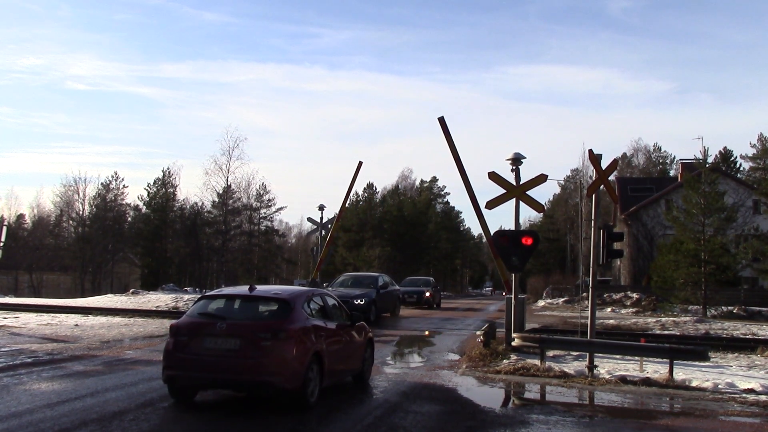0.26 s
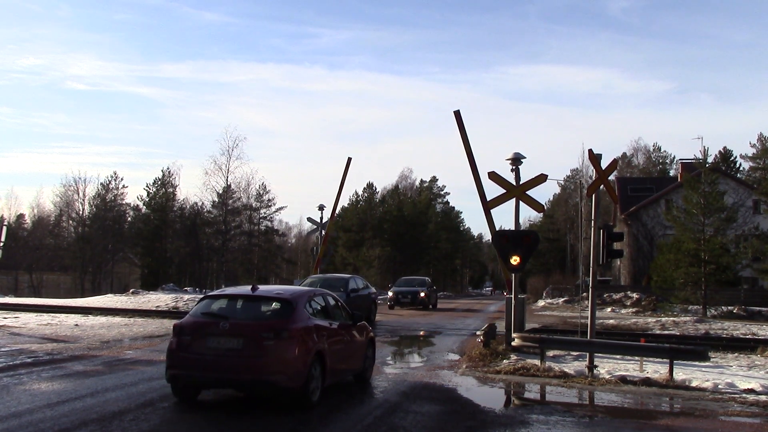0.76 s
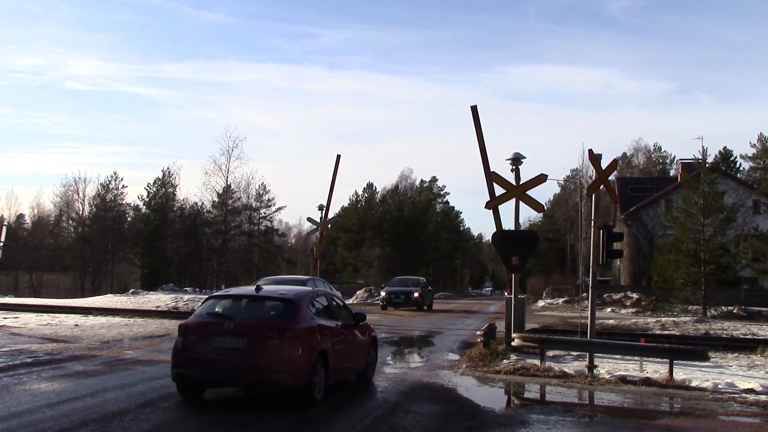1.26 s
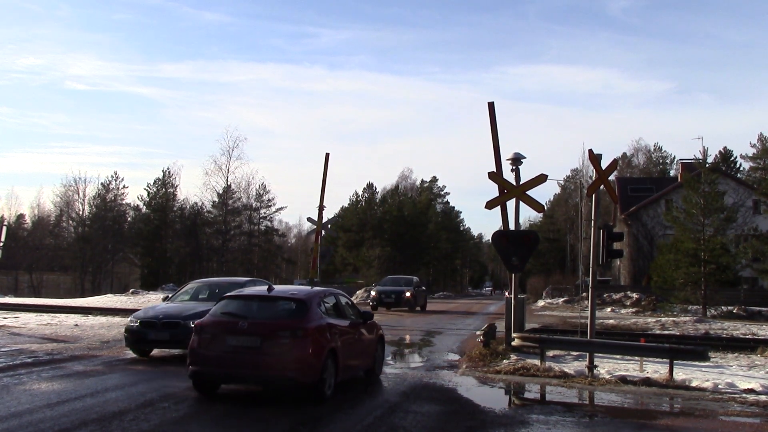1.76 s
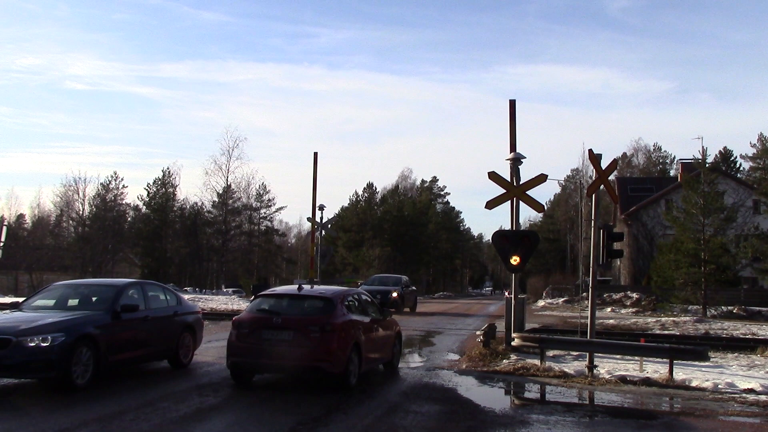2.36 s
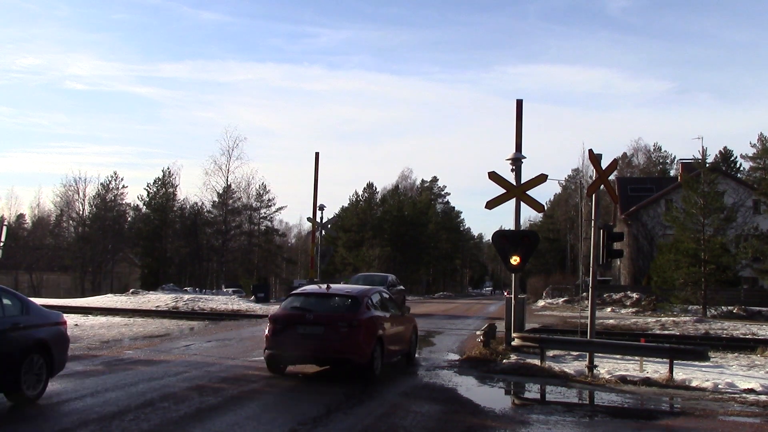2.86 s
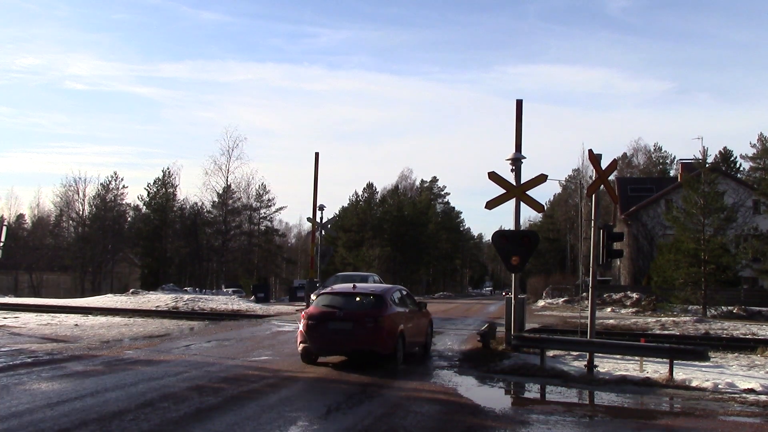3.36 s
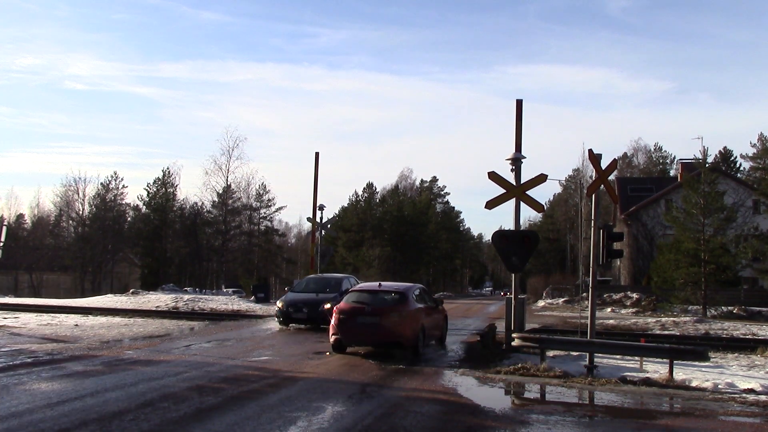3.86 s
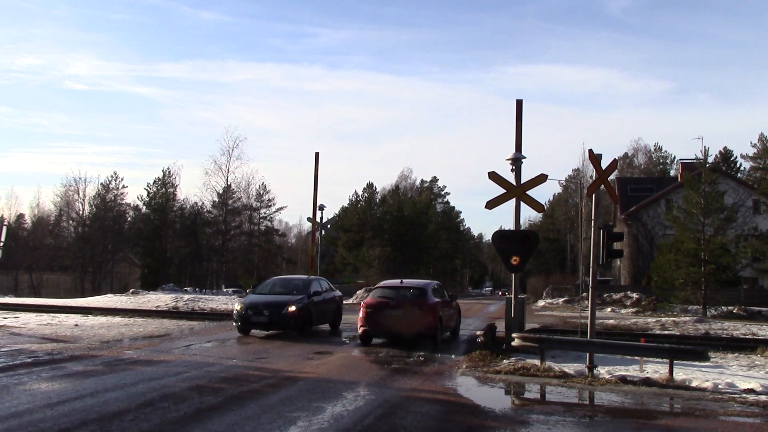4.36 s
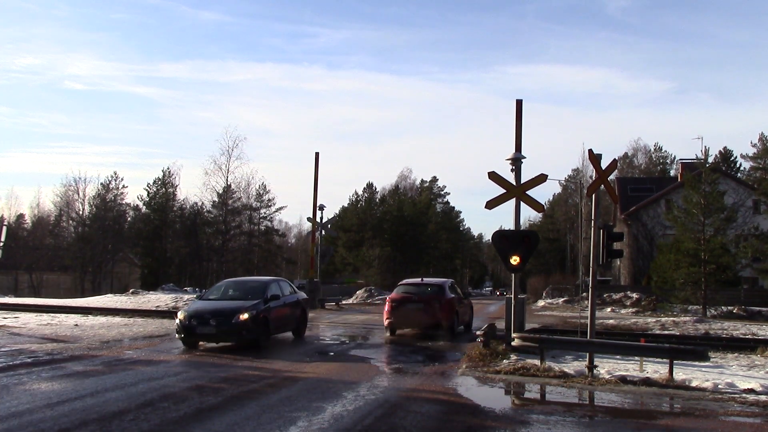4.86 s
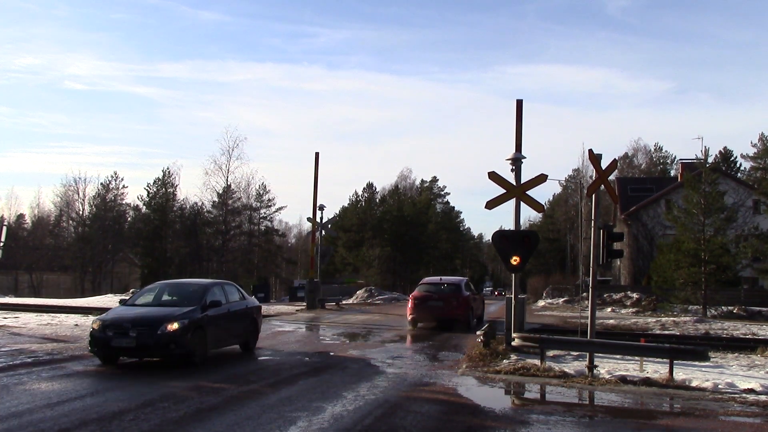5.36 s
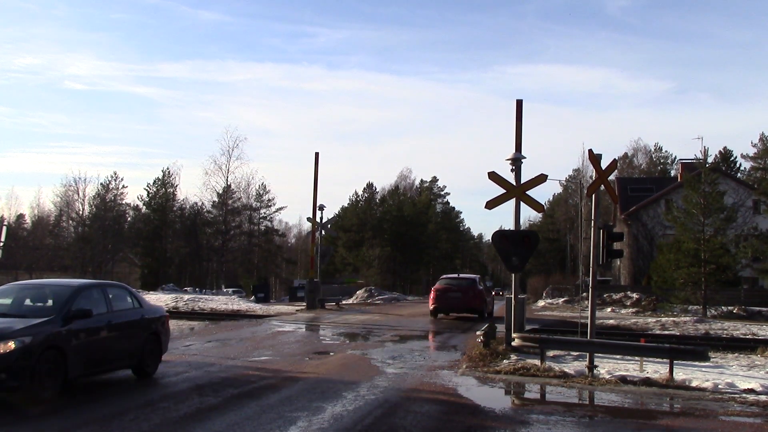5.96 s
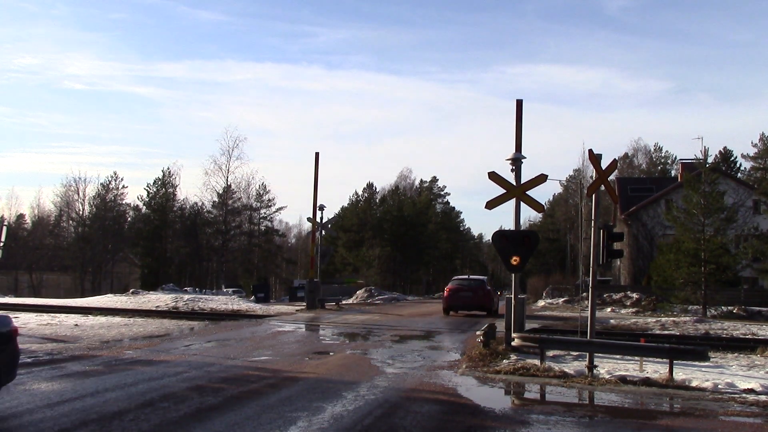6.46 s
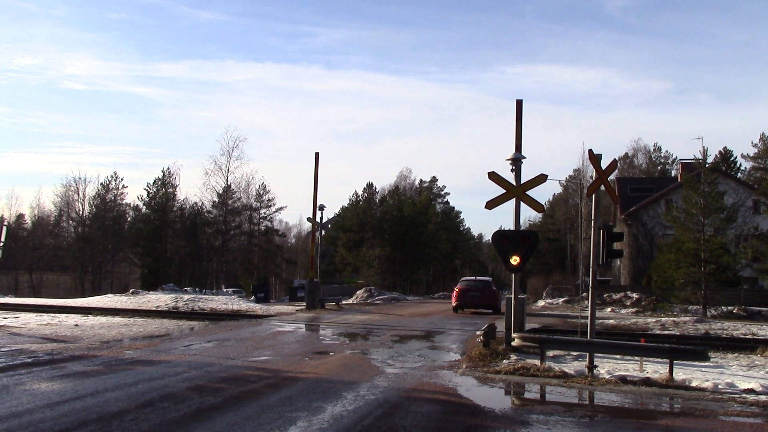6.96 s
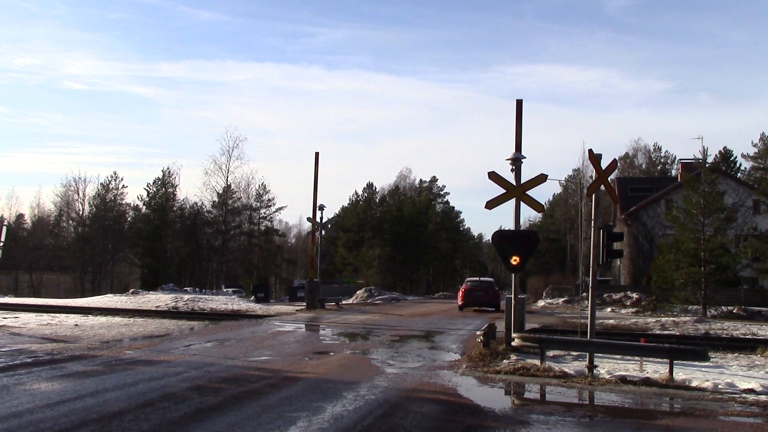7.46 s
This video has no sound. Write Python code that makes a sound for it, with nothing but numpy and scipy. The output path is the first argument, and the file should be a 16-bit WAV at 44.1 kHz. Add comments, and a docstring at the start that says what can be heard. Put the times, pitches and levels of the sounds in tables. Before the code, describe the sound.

Slow tyres on wet, gritty asphalt, heard close from the roadside. A quiet rolling drone with scattered pops leads to a cluster of muffled rail thumps and puddle splashes. After a calmer stretch of hiss, another lighter set of thumps follows. Then spray and tread roar swell, and hard, hollow grit pops crackle almost continuously until the sound cuts off, still loud.

```python
"""Wet tyres drone, roar and hiss while grit pops from the tread: cars roll slowly over a gritty level crossing.
Coloured noise makes the rolling, hiss and spray; short damped swings make the grit pops and rail thumps.
Bursts of filtered noise make the puddle splashes. Two close microphone ports on a roadside camera
hear nearly the same sound and part mostly in the treble, a little in the upper roar."""
import sys
import numpy as np
from scipy import signal
from scipy.fft import rfft, irfft, next_fast_len
from scipy.io import wavfile
from scipy.ndimage import uniform_filter1d, map_coordinates

SR = 44100
rng = np.random.default_rng(int(sys.argv[2]) if len(sys.argv) > 2 else 0)


def waveform_to_disk(signal):
    """Save audio, clipped to [-1, 1], as 16-bit WAV at the path in sys.argv[1]."""
    frames = np.transpose(np.atleast_2d(signal))
    scaled = np.clip(frames, -1, 1) * 32767
    samples = np.round(scaled).astype(np.int16)
    wavfile.write(sys.argv[1], SR, samples)


N = 340363

# Rolling tyres, average levels before the small wobbles:
# start_s [s], drone_db [dB], tread_roar_db [dB], carcass_rumble_db [dB]
ROLLING_LEVELS = [(0.0, -31, -34.5, -48.5), (0.62, -34.5, -35, -46), (1.57, -31.5, -30, -51),
                  (1.91, -34.5, -33, -48), (2.38, -36, -30.5, -48), (3.33, -31, -27, -43),
                  (4.45, -34, -28.5, -45), (4.9, -35.5, -26, -42.5), (5.59, -36.5, -25, -43.5),
                  (5.95, -34.5, -24, -41.5), (6.28, -33.5, -23, -38), (6.68, -31, -21, -40),
                  (7.13, -30, -22, -35.5), (7.4, -31.5, -23, -36.5), (7.72, -30.5, -24, -38)]
# Where the loudest car is and how wide the scene sounds: start_s [s], aside [0 ahead to 1 far aside],
# left_shade [0-1], unrelated_spray [amount 0-1], unrelated_roar [amount 0-1]
CAR_POSITION = [(0, 0.02, 0.1, 0.08, 0.01), (1, 0.12, 0.09, 0.12, 0.04), (1.7, 0.17, 0.04, 0.1, 0.05),
                (2.1, 0.35, 0, 0.09, 0.0), (3, 0.21, 0.01, 0.44, 0), (3.7, 0.88, 0.17, 0.66, 0),
                (4.3, 0.4, 0.06, 0.58, 0), (5, 0.17, 0.01, 0.18, 0.0), (5.8, 0.3, 0, 0.22, 0),
                (6.4, 0.29, 0.09, 0.38, 0), (7.1, 0.78, 0.15, 0.74, 0.05), (7.72, 0.97, 0.2, 0.7, 0.07)]


def undb(db):
    """Turn decibels into a plain gain."""
    return 10 ** (np.asarray(db) / 20)


def curves(table):
    """Draw straight lines between table rows, giving one curve over time per column."""
    start_s, *columns = np.transpose(table)
    times = np.arange(N) / SR
    return [np.interp(times, start_s, column) for column in columns]


def hiss_noise():
    """Plain white noise for the whole scene."""
    return rng.standard_normal(N)


def colour(x, spectrum):
    """Shape x to a spectrum of (Hz, relative dB) points; rms 1."""
    hz, db = np.transpose(spectrum)
    size = next_fast_len(N)
    f = np.maximum(np.arange(size // 2 + 1) * SR / size, 1)
    gain = undb(np.interp(np.log(f), np.log(hz), db))
    y = irfft(rfft(x, size) * gain, size)[:N]
    return y / np.std(y)


def band(x, lo_hz, hi_hz):
    """Keep mainly the sound between two pitches."""
    sos = signal.butter(2, [lo_hz, min(hi_hz, 0.45 * SR)], "band", fs=SR, output="sos")
    return signal.sosfilt(sos, x)


def steep(x, lo_hz, hi_hz):
    """Band-pass run forwards and backwards: steep and without delay."""
    forwards = band(x, lo_hz, hi_hz)
    return band(forwards[::-1], lo_hz, hi_hz)[::-1]


def delay(x, seconds):
    """Make x later by a fixed or slowly changing time."""
    return map_coordinates(x, [np.arange(N) - seconds * SR], order=3, mode="nearest")


def walk(rate):
    """Slow random wobble: a new level rate times a second, with ramps between; spread 1."""
    k = int(SR / rate)
    steps = np.repeat(rng.standard_normal(N // k + 1), k)
    wobble = uniform_filter1d(steps, k)[:N]
    return wobble / np.std(wobble)


def add(track, start_s, sound):
    """Mix a short sound into the track, cut off at the end."""
    i = int(start_s * SR)
    track[i:i + len(sound)] += sound[:max(N - i, 0)]


def ring(hz, t60, rise, sag):
    """A damped swing with a short push that starts sharp and sags to its pitch; peak 1."""
    t = np.arange(int(t60 * SR) + 2) / SR
    pitch = hz * (1 + sag * np.exp(-t * hz))
    phase = 2 * np.pi * np.cumsum(pitch) / SR
    y = (1 - np.exp(-t / rise)) * undb(-60 * t / t60) * np.sin(phase)
    return y / np.abs(y).max()


def droplets(rate, spread_db, share):
    """Noise with about rate lone clicks a second, of uneven but bounded size; share is their rms."""
    size = undb(spread_db * np.minimum(rng.exponential(size=N), 2.3))
    hits = (rng.random(N) < rate / SR) * size * rng.choice([-1, 1], N)
    return hiss_noise() + share * hits / np.std(hits)


def rails():
    """Rumble level of each car on the rails: it swells, then settles fast; gain."""
    # A car on the rails until its last wheel is over:
    # start_s [s], end_s [s], end_level_db [dB, before the judder]
    cars_on_rails = [(0.823, 1.648, -33), (3.262, 4.114, -32.5)]
    swell_db, settle_s, judder_db = 9, 0.1, 0.8
    t, power = np.arange(N) / SR, 0
    for start, end, db in cars_on_rails:
        swell = undb(db - swell_db * np.clip((end - t) / (end - start), 0, 1))
        outside_s = np.maximum(start - t, 0) + np.maximum(t - end, 0)
        power = power + (swell * np.exp(-outside_s / settle_s)) ** 2
    return np.sqrt(power) * undb(judder_db * walk(22.08))


def rolling(bumps):
    """Rubber on rough asphalt rumbles, drones and roars; loose grit crackles in the tread band."""
    # Sound colours of carcass, rails, drone and tread: pitch_hz [Hz], level_db [relative dB per Hz]
    rumble_colour = [(18, -63), (30, -43), (59, -46), (130, -7.5), (226, 0), (420, -3.5), (550, -39),
                     (920, -120)]
    rail_colour = [(18, -60), (30, -43), (59, -42), (100, -16), (130, -4.5), (226, -2), (330, -2),
                   (420, -5.5), (550, -37), (920, -120)]
    drone_colour = [(250, -29.5), (420, -6), (500, -0.5), (600, -0.5), (670, -1), (720, -2), (900, -6.5),
                    (1170, -18), (1500, -23), (1680, -13), (1800, -20), (2400, -60)]
    tread_colour = [(530, -34), (900, 0), (1320, 3), (1450, 0.5), (1660, 3.5), (2100, -2.5), (2730, -42),
                    (4620, -120)]
    drone_db, tread_db, carcass_db = curves(ROLLING_LEVELS)
    carcass = colour(hiss_noise(), rumble_colour) * undb(carcass_db + 0.79 * walk(12))
    rail_rumble = colour(hiss_noise(), rail_colour) * rails()
    drone = colour(hiss_noise(), drone_colour) * undb(drone_db + 0.6 * bumps)
    tread_level = undb(tread_db + 0.11 * bumps + 0.096 * walk(25))
    tread = colour(droplets(300, 5.2, 0.66), tread_colour) * tread_level
    return carcass + rail_rumble + drone + tread


def water(bumps):
    """Water film tears off the tread: one uneven stream feeds hiss, spray and mist; bigger drops sizzle."""
    # Water under the tyres, average levels before the wobbles:
    # start_s [s], film_hiss_db [dB], sizzle_db [dB], fine_spray_db [dB], mist_db [dB]
    wet_levels = [(0.0, -37.5, -50, -51.5, -62), (0.52, -42.5, -48, -49.5, -59),
                  (0.99, -34.5, -45, -47.5, -61), (1.27, -35.5, -37.5, -45, -59), (1.5, -28, -37, -43, -57),
                  (1.7, -33.5, -43, -41, -56), (1.91, -32.5, -37, -38.5, -52),
                  (2.4, -30, -33.5, -33.5, -46), (3.01, -31, -27, -34, -44.5), (3.5, -39, -26, -34, -47.5),
                  (3.95, -28.5, -28.5, -35.5, -49.5), (4.45, -29.5, -28.5, -34.5, -47),
                  (4.92, -29.5, -28.5, -33.5, -50.5), (5.74, -27.5, -45, -34.5, -47),
                  (6.0, -26.5, -51, -33, -43.5), (6.47, -25, -27.5, -31.5, -42.5),
                  (6.9, -27.5, -25, -32.5, -45.5), (7.33, -27, -32, -37, -53), (7.55, -27.5, -35, -39, -53),
                  (7.72, -28.5, -37, -41, -55)]
    # Sound colours of the wet layers; air is the highest treble of the mist:
    # pitch_hz [Hz], level_db [relative dB per Hz]
    hiss_colour = [(1240, -50), (2100, 1), (3660, -5), (4800, -23), (6240, -58), (10600, -120)]
    sizzle_colour = [(1800, -26.5), (2600, 1), (3100, -0.5), (3800, -2), (4600, -10.5), (7000, -60)]
    spray_colour = [(2820, -76), (4800, -1), (5400, 3), (5900, 2.5), (8070, 1), (9800, -9), (12700, -30),
                    (21600, -120)]
    mist_colour = [(5760, -7.5), (9800, -3.5), (12000, -7.5), (14100, -13), (15600, -23)]
    air_colour = [(9000, -30), (11500, -8), (13000, 3), (15000, 1), (16500, -3)]
    air_db = -2.5  # against the mist, for a car far aside
    hiss_db, sizzle_db, spray_db, mist_db = curves(wet_levels)
    aside = curves(CAR_POSITION)[0]
    flow, drops = walk(9), droplets(600, 6.7, 0.62)
    hiss = colour(drops, hiss_colour) * undb(hiss_db + 0.22 * flow + 1.4 * bumps)
    spray = colour(drops, spray_colour) * undb(spray_db + 0.51 * flow + 0.79 * walk(14))
    mist = colour(drops + 1.5 * hiss_noise(), mist_colour) * undb(mist_db + 0.9 * flow + 1.0 * walk(14))
    big_drops = droplets(300, 4.3, 0.58)
    sizzle = colour(big_drops, sizzle_colour) * undb(sizzle_db + 0.35 * flow + 0.9 * walk(24))
    air_level = aside * undb(mist_db + air_db + 1.3 * flow + 1.2 * walk(12))
    air = colour(drops + 2 * hiss_noise(), air_colour) * air_level
    return hiss + sizzle + spray + mist + air


def splashes():
    """A sudden sheet of water, brightest around its centre, that falls back."""
    # Puddle splashes: start_s [s], level_db [dB rms that the fade starts from], centre_hz [Hz],
    # fade_s [s to fall 60 dB]
    puddles = [(0.601, -30.5, 5240, 0.28), (0.635, -36.5, 5600, 0.36), (0.678, -32, 6050, 0.12),
               (0.8116, -33, 5720, 0.08), (0.85, -36.5, 7400, 0.24), (0.956, -29, 7500, 0.11),
               (1.103, -37, 4980, 0.2), (1.1895, -30, 4860, 0.16), (1.3194, -38, 5220, 0.2),
               (1.4277, -36, 5650, 0.2), (1.4837, -30.5, 6150, 0.54), (3.82, -27, 5800, 0.48),
               (3.75, -37, 6000, 0.15), (3.975, -27, 5500, 0.12), (5.7642, -28, 6700, 0.3),
               (6.27, -23.5, 6950, 0.097), (6.7306, -31, 6900, 0.11), (6.9153, -25, 6600, 0.11),
               (7.026, -26, 4400, 0.086), (7.055, -25.5, 5500, 0.17), (7.126, -24, 6300, 0.091),
               (7.294, -33, 6500, 0.2), (7.58, -37, 6500, 0.15)]
    out, t = np.zeros(N), np.arange(SR // 3) / SR
    noises = rng.standard_normal((len(puddles), len(t)))
    for (start_s, db, hz, fade_s), noise in zip(puddles, noises):
        sheet = steep(noise, 0.5 * hz, 1.31 * hz) + 0.37 * steep(noise, 2200, 9600)
        rise = np.minimum(t / 0.0023, 1)
        fade = undb(db - 60 * t / max(fade_s, 0.02))
        add(out, start_s, fade * rise * sheet / np.std(sheet))
    return out


def thumps():
    """The tyre carcass rings briefly at each rail."""
    # Wheels over the rails: start_s [s], peak_db [dB], pitch_hz [Hz, once settled]
    rail_hits = [(0.869, -24, 272), (1.08, -20, 232), (1.115, -25, 257), (1.168, -25, 266),
                 (1.22, -38, 110), (1.312, -24, 169), (1.325, -34.5, 105), (1.414, -29, 388),
                 (1.473, -22.5, 270), (1.506, -30, 261), (1.545, -21, 240), (1.563, -24, 280),
                 (1.584, -21, 261), (1.601, -16.5, 260), (1.613, -17.5, 308), (1.624, -17.5, 330),
                 (1.63, -17, 202), (1.742, -30, 192), (3.506, -31, 250), (3.528, -32, 172),
                 (3.53, -37, 100), (3.578, -32, 315), (3.66, -34, 240), (3.797, -30, 298),
                 (3.844, -25, 299), (3.899, -24, 296), (3.949, -25, 191), (3.965, -23, 305),
                 (4.011, -20, 280), (4.043, -20.5, 307), (4.04, -37, 139), (4.17, -28, 219),
                 (4.246, -30, 185), (4.85, -39, 110)]
    out = np.zeros(N)
    for start_s, db, hz in rail_hits:
        add(out, start_s, undb(db) * ring(hz, t60=8.5 / hz, rise=0.005, sag=0.3))
    return out


def small_pops():
    """Random lesser grit, denser and louder as the tread roar grows; rows like the loud pops."""
    count = 320
    over_roar_db, spread_db = 5, 2  # peak over the tread roar, and its scatter
    pitch_hz, spread_octaves = 1500, 0.4
    swings, tick_db, rattle_db = 11, -18, -18
    tread_db = curves(ROLLING_LEVELS)[1]
    # louder roar takes a larger share of the random start times
    share = np.cumsum(undb(tread_db) ** 2)
    at = np.searchsorted(share / share[-1], rng.random(count))
    size, pitch = rng.standard_normal((count, 2)).T
    peak_db = tread_db[at] + over_roar_db + spread_db * size
    hz = pitch_hz * 2 ** (spread_octaves * np.clip(pitch, -1.5, 2))
    same_for_all = np.outer([swings, tick_db, rattle_db], np.ones(count))
    return np.transpose([at / SR, peak_db, hz, *same_for_all])


def pops():
    """Grit swings the tread cavity a few times, with a tick on top and a short rattle of echoes under the car."""
    # Loud grit popping out of a tread, before the final band filter: start_s [s], peak_db [dB], pitch_hz [Hz],
    # swings [count until 60 dB down], tick_db [dB rms against the pop], rattle_db [dB against the pop]
    loud_pops = [(0.1093, -16, 1310, 6, -29, -18), (0.1186, -6, 1250, 6, -35, -21),
                 (0.1838, -8, 1400, 8, -30, -21), (0.4056, -15, 1110, 6, -26, -24),
                 (0.5274, -16, 1480, 8, -33, -24), (0.7182, -16, 1550, 11, -21, -24),
                 (0.7617, -16, 1260, 5, -25, -24), (0.8044, -17, 1200, 6, -23, -17),
                 (0.8523, -18, 1550, 8, -16, -15), (0.8926, -17, 1060, 8, -26, -12),
                 (0.9754, -17, 1260, 11, -17, -13), (0.9976, -16, 1610, 15, -23, -14),
                 (1.0631, -20, 1260, 15, -21, -16), (1.0953, -17, 980, 15, -26, -12),
                 (1.1645, -11, 1160, 6, -29, -16), (1.1959, -16, 1060, 5, -21, -16),
                 (1.2455, -12, 1550, 5, -24, -24), (1.3062, -15, 1680, 6, -19, -12),
                 (1.4121, -11, 1310, 5, -28, -24), (1.5673, -5, 1020, 6, -31, -24),
                 (1.5877, -13, 1060, 8, -21, -15), (1.6193, -6, 1110, 11, -26, -20),
                 (1.634, -14, 1750, 5, -20, -24), (1.7287, -17, 1110, 5, -17, -18),
                 (1.7416, -14, 1020, 15, -20, -12), (1.7894, -15, 1310, 8, -20, -24),
                 (1.8165, -16, 1360, 5, -18, -24), (2.1911, -9, 2400, 8, -17, -18),
                 (2.4832, -15, 1360, 15, -22, -24), (2.546, -11, 900, 5, -21, -12),
                 (2.5797, -11, 980, 8, -14, -19), (2.8821, -11, 3300, 15, -16, -14),
                 (2.9387, -11, 1750, 5, -21, -13), (3.0111, -13, 3300, 12, -15, -18),
                 (3.379, -8, 3300, 12, -15, -20), (3.4317, -8, 2160, 5, -23, -16),
                 (4.1244, -9, 1200, 6, -21, -12), (4.3253, -12, 1680, 11, -20, -12),
                 (4.5312, -6, 1260, 8, -18, -18), (4.5437, -7, 1480, 5, -19, -24),
                 (4.5651, -7, 2440, 5, -20, -24), (4.6532, -5, 1610, 6, -16, -24),
                 (4.7657, -12, 1310, 11, -15, -24), (4.8533, 1, 1400, 5, -23, -21),
                 (5.0194, -12, 1110, 11, -15, -21), (5.0502, -8, 1160, 15, -20, -24),
                 (5.0662, -11, 1900, 5, -14, -19), (5.0991, -5, 1200, 11, -16, -15),
                 (5.1383, -2, 1420, 15, -23, -18), (5.1457, -9, 1610, 11, -23, -24),
                 (5.179, -5, 1160, 11, -22, -24), (5.1977, -3, 1310, 5, -18, -22),
                 (5.2083, -10, 1060, 6, -11, -24), (5.2495, -9, 1700, 5, -18, -24),
                 (5.2559, -6, 1300, 11, -17, -24), (5.302, -8, 2800, 14, -14, -18),
                 (5.3114, -2, 1310, 11, -23, -24), (5.3729, -4, 1680, 11, -20, -18),
                 (5.429, -8, 1360, 6, -16, -18), (5.4366, 0, 1300, 6, -20, -18),
                 (5.4476, -13, 1420, 8, -17, -18), (5.4679, -10, 1480, 8, -20, -15),
                 (5.5994, -11, 1110, 6, -16, -18), (5.6085, -9, 1310, 5, -19, -24),
                 (5.6895, -7, 1260, 8, -20, -24), (5.7278, 1, 1110, 8, -18, -14),
                 (5.7649, 1, 1600, 5, -20, -18), (5.772, -3, 1420, 5, -21, -18),
                 (5.7765, -4, 1320, 8, -20, -16), (5.8231, -7, 1260, 6, -19, -24),
                 (5.8528, -7, 1680, 5, -16, -18), (5.8617, -10, 1610, 8, -20, -18),
                 (5.8756, -7, 1160, 8, -23, -24), (5.8989, -9, 1260, 8, -17, -13),
                 (5.9294, -6, 1160, 6, -17, -24), (6.0109, 0, 1420, 5, -18, -14),
                 (6.0332, -5, 1150, 8, -13, -24), (6.0901, -5, 1700, 5, -15, -18),
                 (6.098, -1, 1060, 11, -26, -13), (6.21, -7, 2000, 6, -14, -24),
                 (6.239, -8, 2600, 11, -15, -18), (6.257, -8, 1750, 8, -15, -18),
                 (6.2708, -7, 2160, 11, -15, -16), (6.303, -6, 2100, 5, -13, -24),
                 (6.326, -9, 1500, 15, -20, -14), (6.37, -9, 2300, 11, -14, -18),
                 (6.409, -9, 1000, 15, -22, -18), (6.4209, -2, 1980, 11, -18, -19),
                 (6.4526, -3, 1500, 5, -14, -24), (6.4667, -3, 1550, 5, -15, -18),
                 (6.4776, -1, 1500, 5, -20, -15), (6.5027, 1, 1160, 5, -19, -15),
                 (6.516, -8, 1100, 15, -20, -12), (6.5452, -6, 1500, 8, -16, -24),
                 (6.5493, -4, 1750, 5, -14, -13), (6.5684, -5, 1200, 9, -14, -24),
                 (6.6231, -4, 1050, 5, -19, -18), (6.6295, -6, 1680, 6, -23, -24),
                 (6.646, -8, 1450, 15, -20, -12), (6.679, -7, 1600, 11, -15, -14),
                 (6.6919, -5, 1200, 15, -20, -24), (6.7318, -4, 1110, 15, -17, -13),
                 (6.7583, -6, 1310, 6, -19, -24), (6.7948, -3, 2070, 5, -15, -13),
                 (6.8262, 0, 1200, 8, -17, -18), (6.8313, -4, 1110, 11, -20, -12),
                 (6.848, -4, 1260, 8, -18, -18), (6.8622, -1, 1100, 12, -18, -12),
                 (6.8845, -6, 1060, 8, -13, -18), (6.8954, -6, 1310, 15, -13, -24),
                 (6.917, -2, 1050, 15, -13, -24), (6.9664, -2, 1110, 15, -13, -17),
                 (6.9965, -4, 1110, 15, -12, -12), (7.0187, -8, 1610, 11, -17, -12),
                 (7.027, -9, 2600, 8, -10, -20), (7.0556, -10, 3200, 12, -15, -20),
                 (7.0983, -3, 980, 15, -16, -17), (7.1405, -5, 2000, 15, -9, -24),
                 (7.1788, 0, 1020, 20, -24, -12), (7.1882, -7, 1050, 15, -25, -24),
                 (7.2075, -12, 2600, 12, -20, -24), (7.2134, 1, 1320, 18, -23, -13),
                 (7.2652, -5, 980, 11, -20, -12), (7.3213, -2, 900, 8, -19, -17),
                 (7.345, -5, 1610, 6, -19, -24), (7.365, -8, 900, 8, -21, -24),
                 (7.4077, -7, 1550, 11, -13, -12), (7.5114, -3, 1050, 6, -14, -22),
                 (7.532, -4, 1280, 6, -20, -20), (7.5488, 0, 1220, 15, -25, -14),
                 (7.6306, -3, 1450, 11, -17, -21), (7.6476, -10, 900, 15, -23, -24),
                 (7.6798, -6, 1260, 11, -19, -18), (7.6892, -11, 2070, 15, -18, -18),
                 (7.6938, -12, 1020, 8, -18, -12)]
    tick_crest_db, rattle_t60_s = 8.5, 0.06  # peak of a tick over its rms; rattle fade time
    out, t = np.zeros(N), np.arange(SR // 16) / SR
    rows = np.vstack([loud_pops, small_pops()])
    noises = rng.standard_normal((len(rows), len(t)))
    for (start_s, db, hz, swings, tick_db, rattle_db), noise in zip(rows, noises):
        add(out, start_s, undb(db) * ring(hz, t60=swings / hz, rise=0.00015, sag=0.1))
        tick = ring(3100, t60=0.006, rise=0.0004, sag=0.1)
        add(out, start_s, undb(db + tick_db + tick_crest_db) * tick)
        tail = band(noise, 0.8 * hz, 1.62 * hz)
        fade = undb(db + rattle_db - 60 * t / rattle_t60_s)
        add(out, start_s + 0.002, fade * tail / np.std(tail))
    return band(out, 600, 12000)


def body_bounce(mid):
    """A bounce off the camera body combs the lower treble; the teeth slide as a car moves round."""
    # The bounce: start_s [s], extra_path_ms [ms], strength [0-1]
    bounce_path = [(0, .53, .12), (2.3, .515, .22), (3.4, .46, .2), (3.9, .45, .06), (4.6, .5, .16),
                   (5.6, .5, .2), (6.7, .455, .26), (7.2, .44, .2), (7.72, .43, .1)]
    extra_ms, strength = curves(bounce_path)
    return strength * delay(steep(mid, 4400, 9500), extra_ms / 1000)


def port_difference(mid, wet):
    """Earlier arrival, shading, unrelated spray and a little unrelated roar part the left port from the right."""
    lead_low_us, lead_high_us = 28, 19  # lead of the left port, far aside, in lower and upper treble
    aside, shade, spread, spread_roar = curves(CAR_POSITION)
    # a small lead in time adds the slope of the wave to one port and takes it from the other
    early = lead_low_us * steep(mid, 4300, 7000) + lead_high_us * steep(mid, 6500, 13000)
    lead = aside * np.gradient(early) * SR / 2e6  # microseconds to seconds, half for each port
    # spray from many places reaches the ports unrelated
    scatter = 0.77 * steep(wet, 3780, 6000) + 0.49 * steep(wet, 6700, 10200) + 1.1 * steep(wet, 9500, 13600)
    scatter = spread * scatter + spread_roar * steep(mid, 1200, 5000)
    # the camera shades the left port around 4 kHz
    shaded = shade * steep(mid, 1950, 5500)
    return lead - shaded + delay(scatter, 0.02)


def scene():
    """Mix all the sources and spread them over the two ports."""
    bumps = walk(9)  # the uneven road shakes the whole tyre
    wet = water(bumps) + splashes()
    mid = rolling(bumps) + wet + thumps() + pops()
    mid = mid + body_bounce(mid)
    side = port_difference(mid, wet)
    return np.array([mid + side, mid - side])


def record(dry):
    """The camera rounds the loudest pops, thins the deep bass and cuts the top."""
    top_hz = 15735
    rounded = dry / (1 + np.abs(dry / 0.98) ** 8) ** 0.125
    thin = signal.sosfilt(signal.butter(3, 75, "high", fs=SR, output="sos"), rounded)
    return signal.sosfilt(signal.ellip(14, 0.2, 80, top_hz, fs=SR, output="sos"), thin)


dry = scene()
out = record(dry)
waveform_to_disk(out)
```